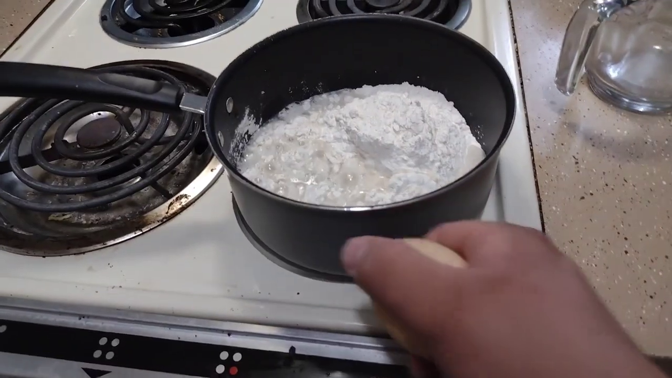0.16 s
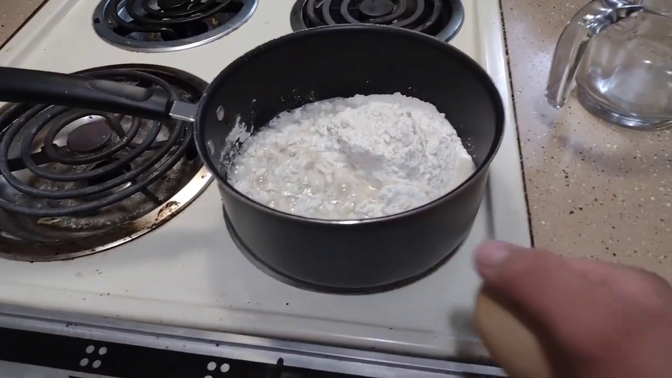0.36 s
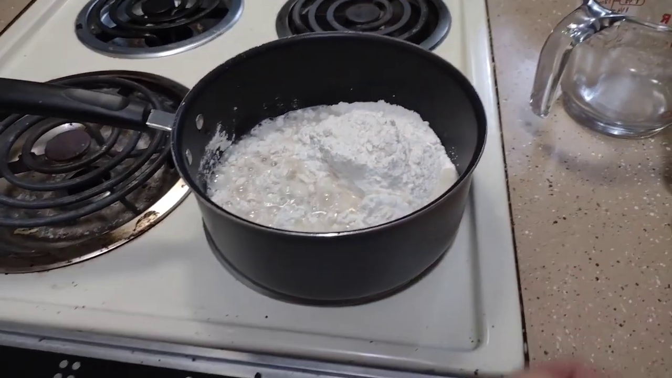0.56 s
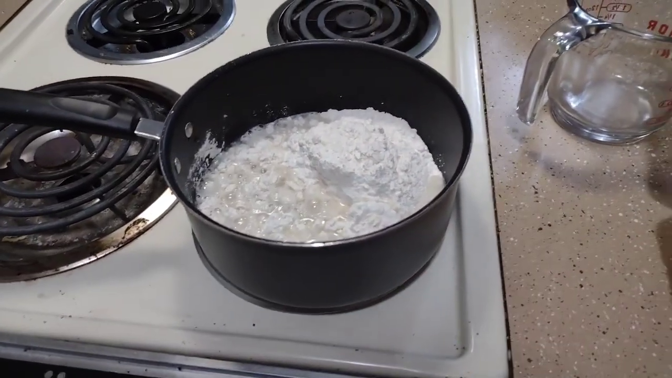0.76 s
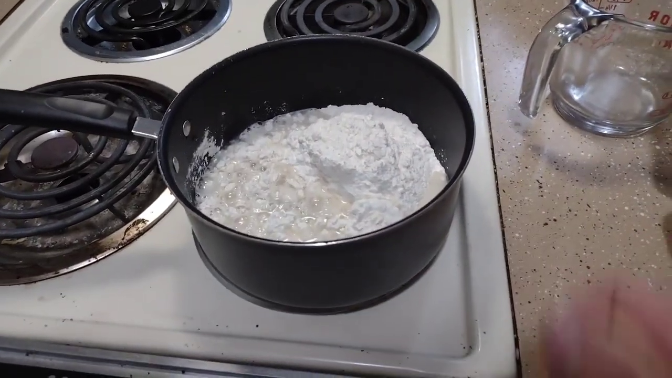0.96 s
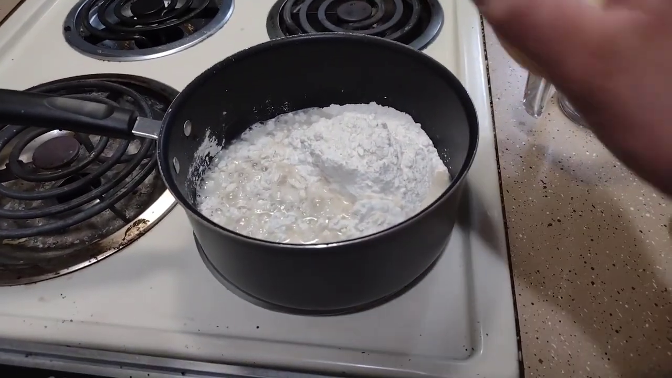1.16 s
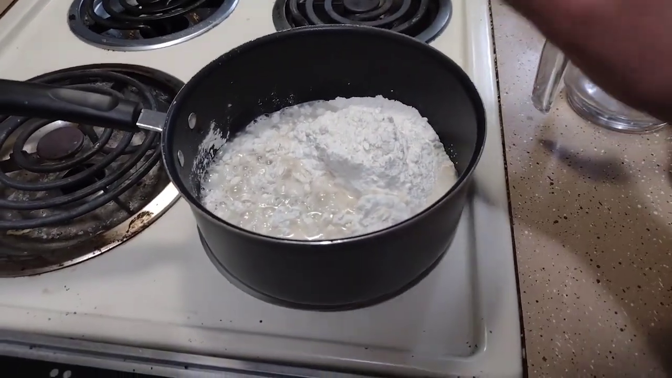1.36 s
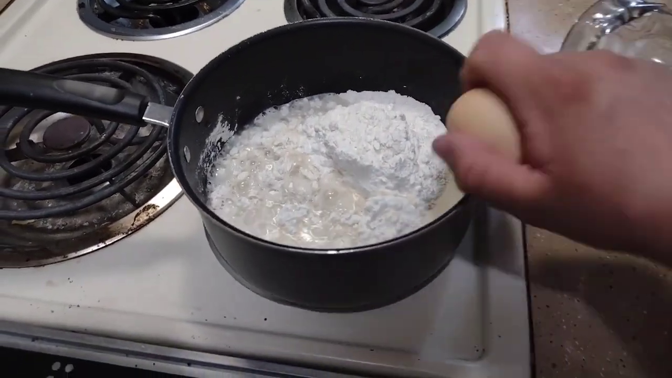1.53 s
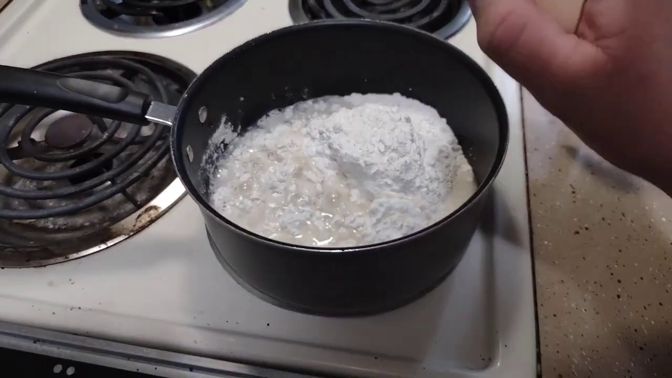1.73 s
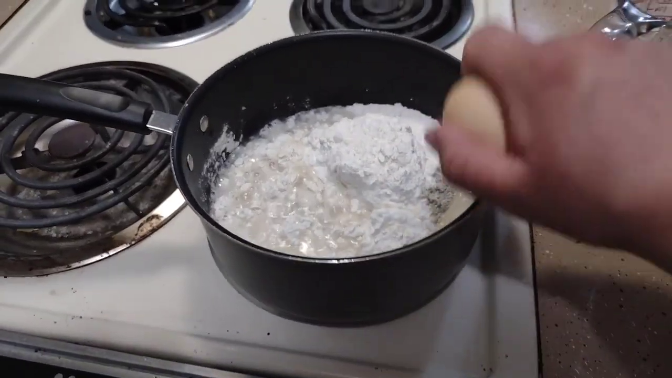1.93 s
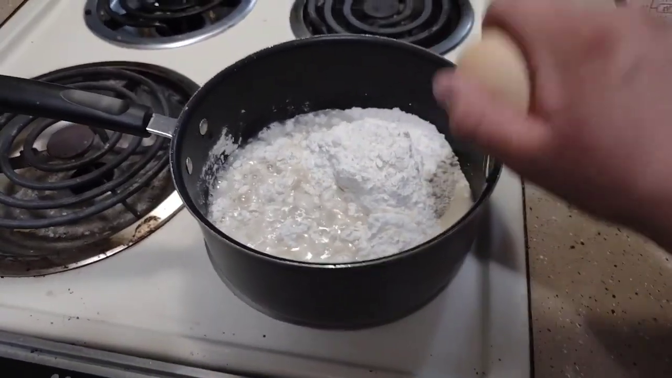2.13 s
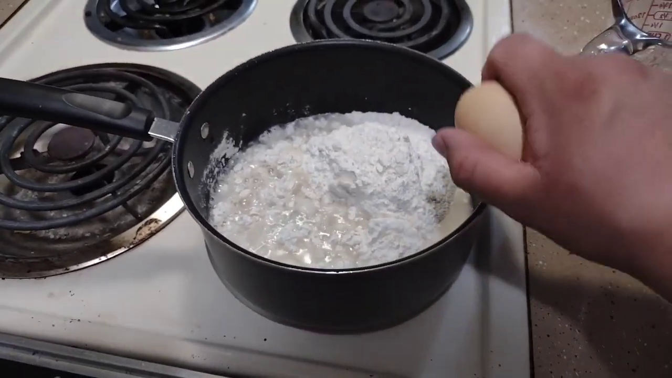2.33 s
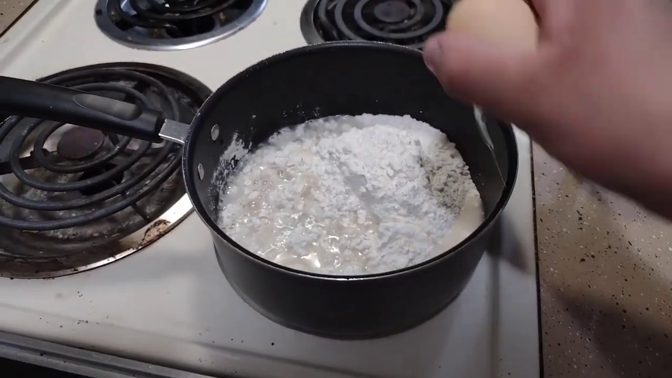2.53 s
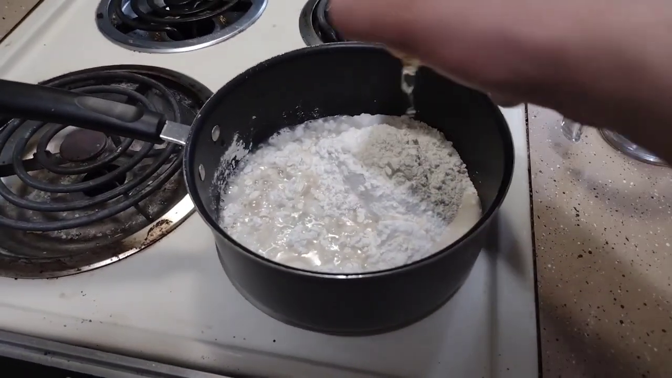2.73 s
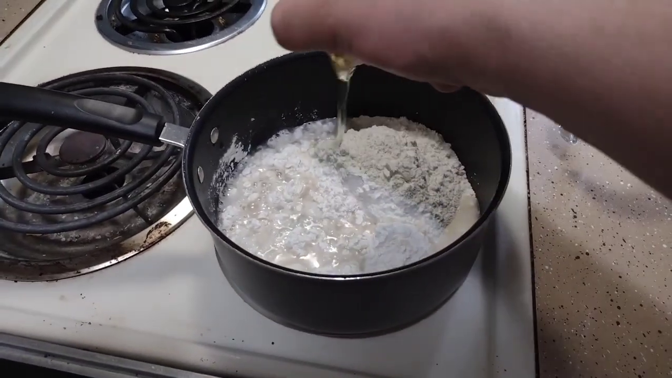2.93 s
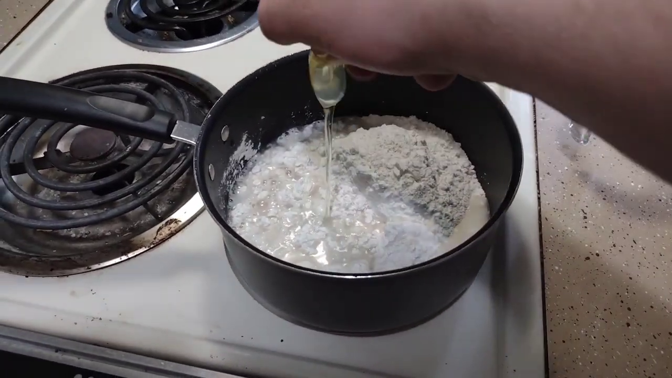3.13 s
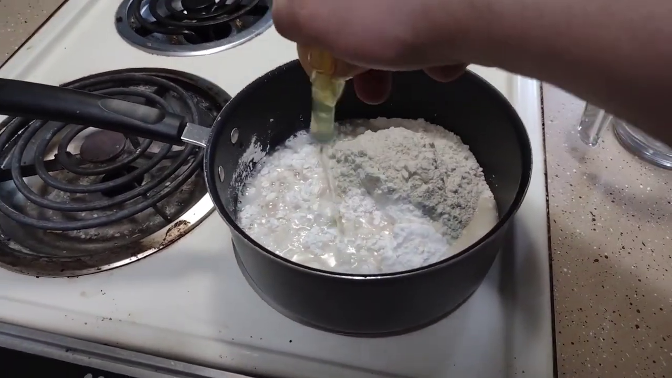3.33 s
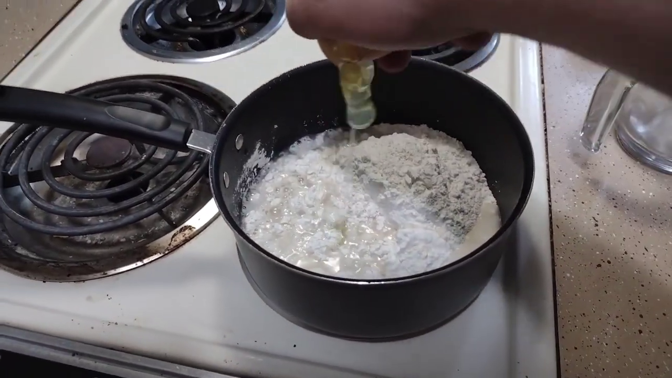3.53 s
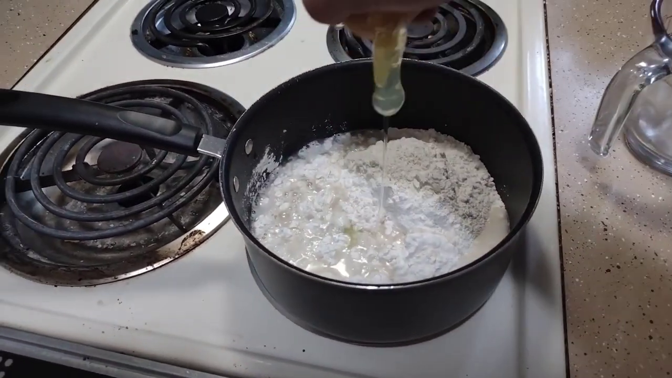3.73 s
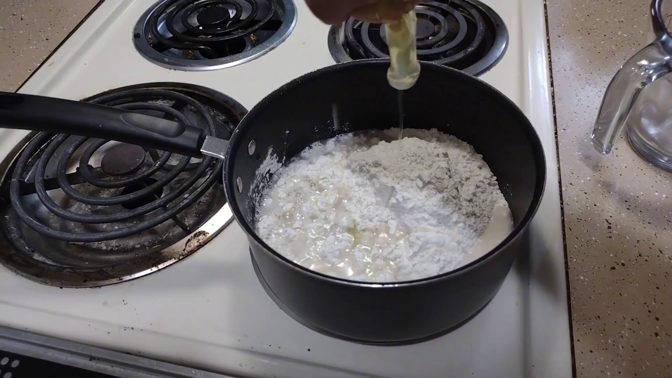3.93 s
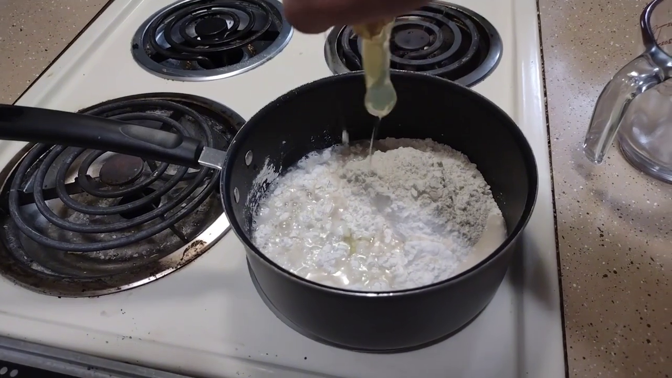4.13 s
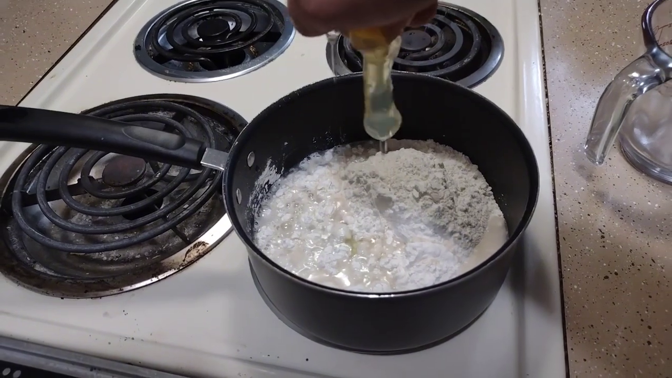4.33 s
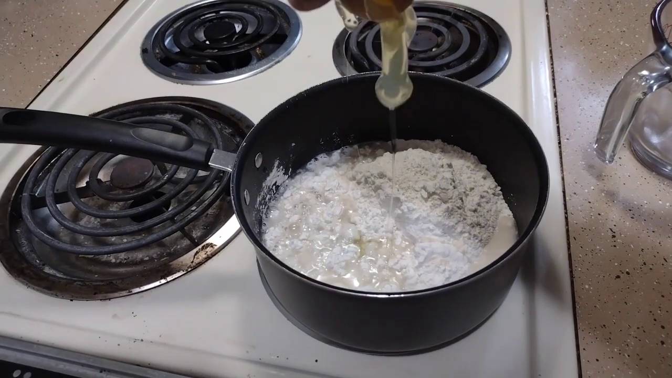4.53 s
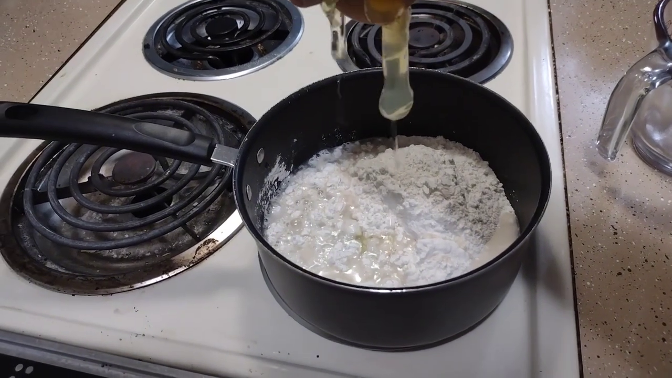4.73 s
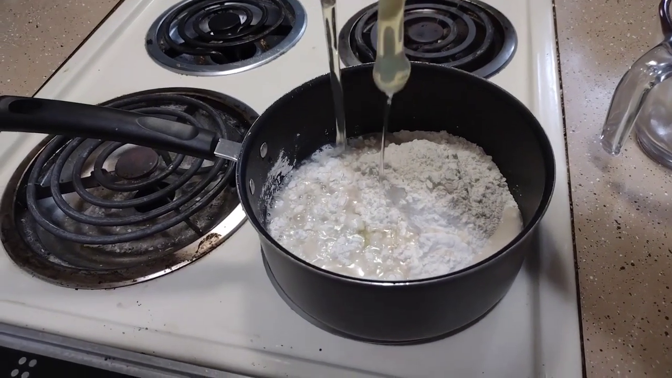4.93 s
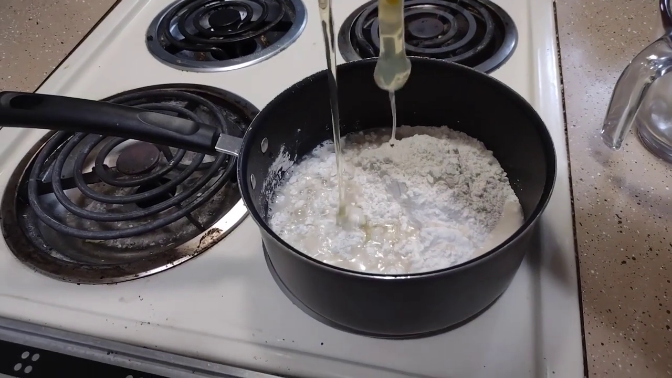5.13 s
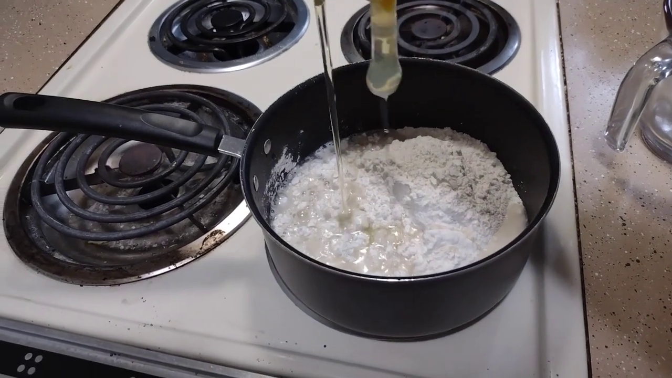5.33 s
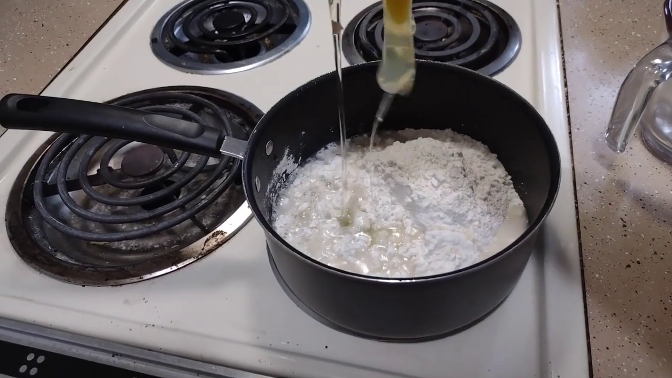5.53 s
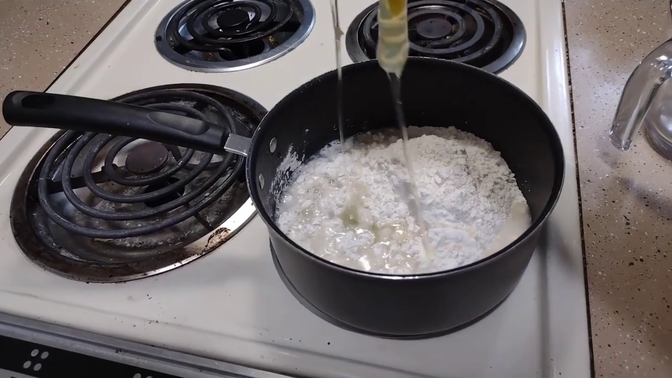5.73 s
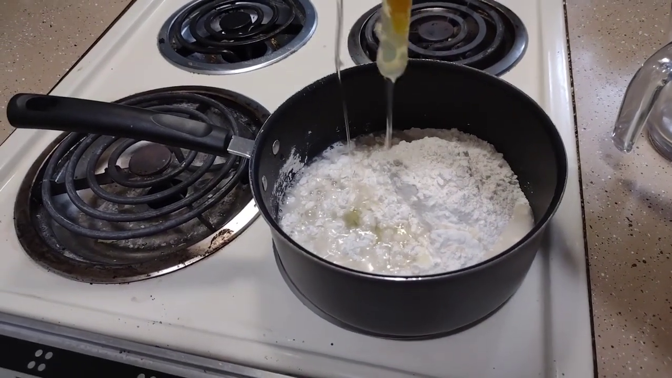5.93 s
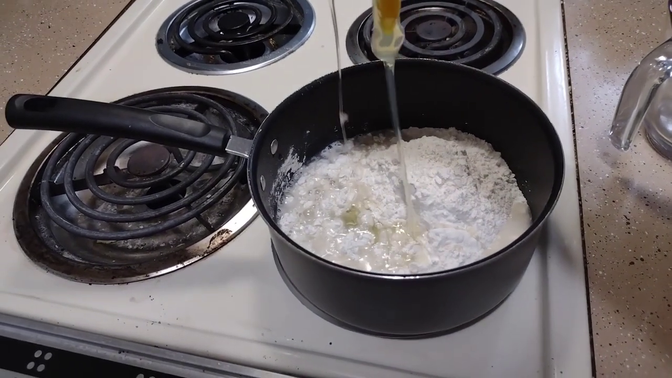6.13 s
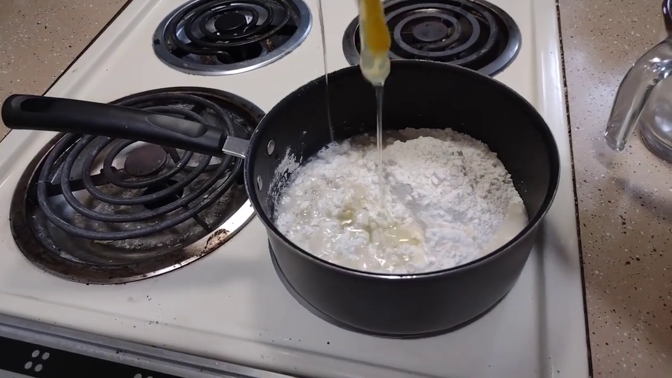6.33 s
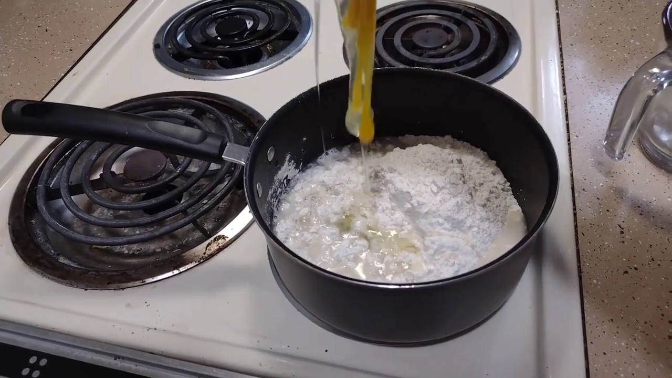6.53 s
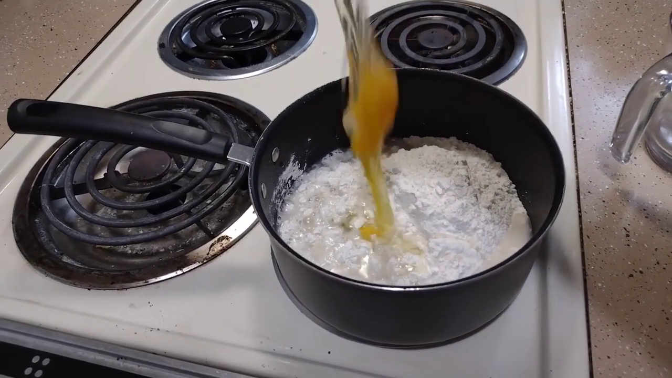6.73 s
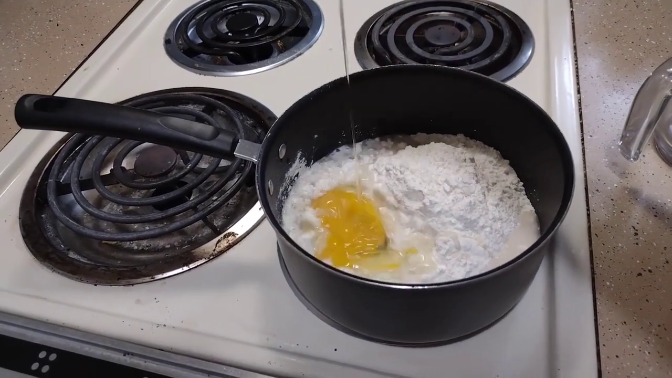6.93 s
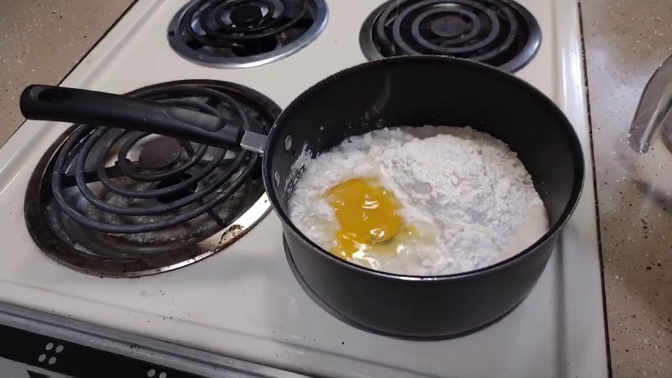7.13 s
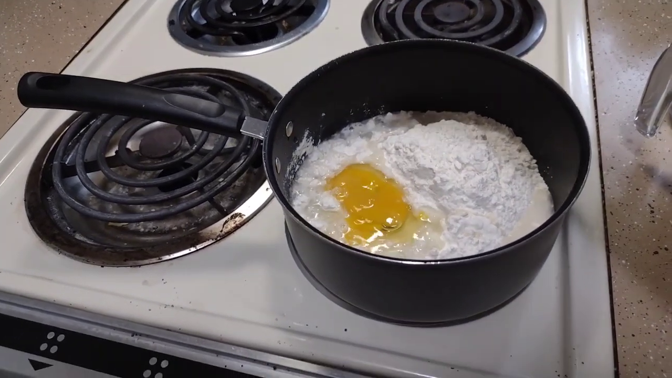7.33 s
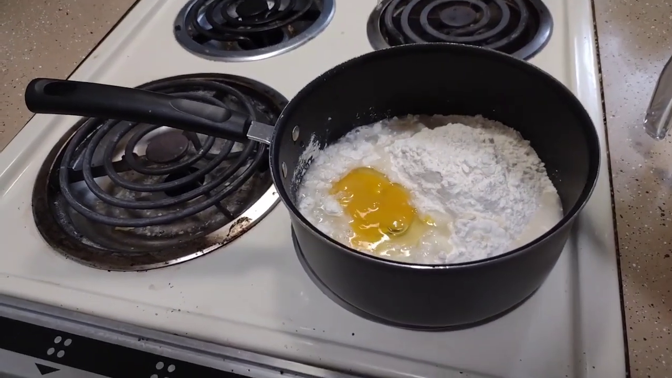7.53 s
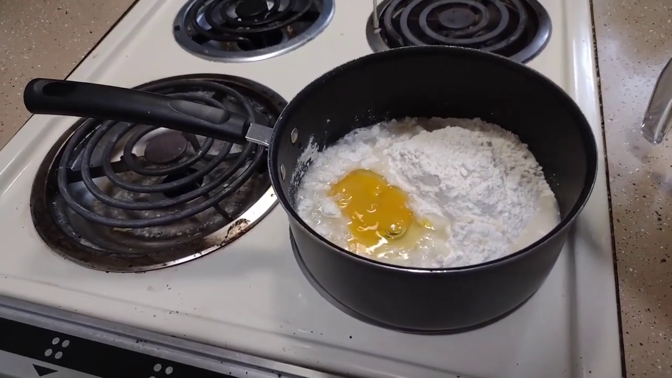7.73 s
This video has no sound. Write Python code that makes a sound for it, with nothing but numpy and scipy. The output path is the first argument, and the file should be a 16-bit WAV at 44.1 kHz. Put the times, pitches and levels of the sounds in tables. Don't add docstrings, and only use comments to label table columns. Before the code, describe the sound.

A dull knock fades right at the start, leaving low room rumble and soft hiss. Then three egg knocks hit a metal pan, the later two louder with rattling rebounds. The eggshell cracks apart crisply, and afterwards delicate crackles come in sparse clusters until the end. Close stereo microphone, short bright reflections from a hard kitchen, background dipping after the first of the three knocks.

```python
import sys
import numpy as np
from scipy import signal
from scipy.fft import rfft, irfft, next_fast_len
from scipy.io import wavfile
from scipy.ndimage import map_coordinates

SR = 44100
rng = np.random.default_rng(int(sys.argv[2]) if len(sys.argv) > 2 else 0)


def int16_out(signal):
    q = np.round(np.clip(np.atleast_2d(signal).T, -1, 1) * 32767)
    wavfile.write(sys.argv[1], SR, q.astype(np.int16))


def ratio(d):
    e = np.asarray(d, float) / 20
    return 10 ** e


N = 342602
LEAD = SR // 4

# start_s, peak_db, bright_db, left_over_right_db
CONTACTS = [(1.594, -14, 0, 4), (1.6052, -17, -25, -1), (1.608, -22.5, -20, -3.5), (1.614, -28, -12, -11),
            (1.632, -29.5, -13.5, 17.5), (1.649, -22, 2.5, 0.5), (1.673, -29.5, -3.5, 8.5),
            (1.699, -26.5, -4.5, 4.5), (1.936, -18.5, 1, -5.5), (1.948, -6.5, -12.5, 16),
            (1.951, -6.5, -33, 20), (1.956, -9, -25, -7), (1.97, -20, -10, 4.5), (1.9905, -3, -20.5, 1),
            (1.994, -9.5, -13, 10.5), (2.007, -15.5, -9, -14.5), (2.019, -23, -5, -1), (2.051, -27, -13, 2),
            (2.065, -11, -23, 13.5), (2.089, -16, -15, 3.5), (2.096, -16, -26, -11), (2.107, -39, -12, 6),
            (2.272, -21, -8, -10.5), (2.277, -23.5, -2, 17), (2.2901, -6.5, -27, 1), (2.309, -20, -10, 3),
            (2.323, -9, -12, 3), (2.338, -11.5, -11.5, -2), (2.353, -14.5, -17, 10)]
# start_s, peak_db, bright_db, left_over_right_db
EARLIER_CONTACTS = [
    (-.06, -10, -30, 1),
    (-.015, -21, -28, 1),
    (.05, -40, -24, 1),
]
# start_s, peak_db, low_hz, high_hz, high_over_low_db
PAN_RINGS = [(1.594, -18, 660, 1710, 5.5), (1.604, -16, 686, 1950, 5), (1.615, -22, 710, 1870, 0),
             (1.641, -22.5, 573, 1617, 5.5), (1.653, -19, 969, 2260, -4), (1.935, -20.5, 614, 1370, -6),
             (1.946, -16.5, 470, 1636, 3.5), (1.949, -12, 967, 2660, -0.5), (1.955, -9.5, 1083, 1660, -2.5),
             (1.965, -19, 448, 2760, -7), (1.973, -14, 440, 1710, -3), (1.989, -11, 719, 1877, 0),
             (1.993, -11.5, 1120, 2330, -2), (2.009, -24, 1210, 1290, -6), (2.021, -17, 953, 2320, -10),
             (2.046, -24, 830, 2090, -2), (2.064, -25, 1130, 1554, 0), (2.088, -24, 1260, 1560, 2),
             (2.272, -21, 650, 2630, 2), (2.276, -21.5, 1290, 1310, -6), (2.29, -15, 575, 1990, -1),
             (2.309, -19, 300, 2300, 0), (2.322, -16.5, 1130, 2480, -7), (2.336, -21, 1155, 1300, 2),
             (2.351, -26, 1145, 2250, 9)]
# frequency_hz, level_db
CLANK_COLOUR = [(180, -30.5), (300, -16.5), (400, -11), (560, -3), (702, -1.5), (890, -8.5), (1100, -4.5),
                (1300, -3.5), (2330, -2.5), (3600, -22), (4600, -18), (6200, -50.5), (9900, -120)]
# frequency_hz, width_hz, level_db
PAN_BODY = [(485, 34, 0), (714, 22, 5.5), (953, 15, 4), (1066, 13, 4), (1200, 35, -11.5), (1560, 43, -3.5),
            (1740, 15, -5), (1884, 23.7, -5), (2270, 30, -8.5), (2355, 24, -5), (2800, 47, -3.5),
            (3270, 30.3, -9.5)]
# frequency_hz, width_hz, level_db
PAN_WALL = [(3620, 110, -7.5), (4270, 40, -7), (4790, 88, -17), (5170, 86, -6), (5800, 35, -5),
            (6320, 79, -4), (6200, 30, -6), (6700, 33, -8), (7700, 55, -16)]
# frequency_hz, level_db
RIM_COLOUR = [(1470, -28.5), (2500, 0), (3490, -6.5), (4800, -7), (6110, -10), (7830, -13), (11900, -17),
              (16000, -26)]
# frequency_hz, width_hz, level_db
STOVE_SHEET = [(115, 80, 0), (190, 153, 2.5), (310, 91, 1)]

# start_s, peak_db, fragment_hz, large_piece_db, sizzle_db
OPENING_CRACKS = [(1.917, -59, 3800, -2.5, -15), (2.5333, -48.5, 4310, -2, -23),
                  (2.584, -51, 4320, -16, -15.5), (2.8634, -61.5, 5330, -2, -10.5),
                  (2.887, -64, 4820, -21, -21), (2.9114, -62.5, 5615, -17.5, -15.5),
                  (3.0525, -34.5, 3600, -12, -7.5), (3.0705, -30.5, 4390, -13, -3),
                  (3.0975, -31.5, 5180, -8.5, -9.5), (3.1075, -36, 3400, -9.5, -4),
                  (3.282, -36, 4036, -1.5, -13),
                  (2.933, -44, 5980, -16.5, -14.5), (2.955, -49.5, 3150, -11, -13),
            (2.9672, -50, 4200, 15.5, -7.5), (2.978, -34, 2930, -12.5, -24),
            (2.991, -35.5, 2950, -13.5, -17.5), (3.0089, -30.5, 4300, -12.5, -15),
            (3.0264, -34, 4060, -10, -20), (3.0335, -33.5, 3030, -6, -15), (3.049, -28, 2933, -10, -12),
            (3.0586, -27, 3950, -15.5, -12), (3.08, -26, 4900, -15.5, -5.5), (3.087, -26.5, 4200, -13, -9),
            (3.0932, -25.5, 4500, -22, -13.5), (3.1022, -24.5, 2790, -16, -9),
            (3.117, -35, 4850, -18, -10.5), (3.1643, -40, 4177, -24, -1), (3.2278, -15, 4270, -13, -15),
            (3.274, -26, 4630, -9.5, -8), (3.2921, -12.5, 4200, -7, -16.5),
            (3.2976, -12.5, 4300, -8, -13.5), (3.3045, -18.5, 4777, -20.5, -13),
            (3.3125, -22, 2680, -18.5, -13.5), (3.3216, -21, 3320, -10, -18.5),
            (3.3329, -19, 4440, -19, -14), (3.3459, -17, 4350, -25, -18.5), (3.3638, -31, 4060, -13, -13.5),
            (3.378, -29.5, 3750, -19, -13), (3.3896, -33.5, 4520, -15, -14)]
# start_s, peak_db,
# fragment_hz, large_piece_db, sizzle_db
LATER_CRACKS = [(3.617, -40, 4350, -4.5, -11.5), (3.6346, -42, 4550, -15, -20),
                (3.7412, -45.5, 3620, -7, -19), (3.8167, -44, 3900, -14, -14),
                (3.855, -54.5, 3710, -6, -8), (3.925, -57, 3390, 2, -19), (4.0704, -54.5, 3820, 3, -16),
                (4.123, -48, 4420, 9, -19), (4.1297, -46.5, 4400, 0.5, -21),
                (4.2418, -40.5, 4300, -12, -22), (4.3044, -49.5, 4240, -7.5, -17),
                (4.356, -44, 4330, -12, -29), (4.5893, -50, 4550, -23.5, -33),
                (4.6286, -47, 4190, -10, -23), (4.6391, -43, 3700, -5.5, -19),
                (4.6472, -43, 3700, -5, -18.5), (4.7177, -50.5, 4010, -18, -25),
                (4.7653, -40, 4200, -23, -34), (5.1058, -59, 4210, -1, -26), (5.1874, -46, 3780, -25, -19),
                (5.2573, -50, 3740, -12, -14), (5.2994, -53, 4080, -15, -26), (5.3594, -52, 3320, -9, -16),
                (5.4008, -45.5, 4030, -18, -13),
                (5.434, -42, 4900, -6, -14), (5.437, -26, 3660, -14.5, -17.5),
                   (5.4454, -47, 3370, -15, -15), (5.4517, -32.5, 3600, -13, -11),
                   (5.463, -42, 3980, -3, -18), (5.4716, -42, 3470, -6, -25), (5.497, -40, 4000, -26, -26),
                   (5.519, -32.5, 4160, -29, -26), (5.525, -47, 3550, -9, -29), (5.659, -63, 3770, -4, -23),
                   (5.7423, -57.5, 3200, -8, -20), (5.765, -55, 3200, -18, -11.5),
                   (5.7822, -50, 4470, -5, -18), (5.7912, -33.5, 4000, -16, -24),
                   (5.8528, -29, 3300, -9.5, -21), (5.8642, -36, 3840, -25, -21),
                   (5.884, -36.5, 4200, -16, -20), (5.9412, -40, 3620, -5, -14),
                   (5.9512, -35.5, 3580, -12, -19), (5.971, -32, 3190, -26, -23),
                   (5.9935, -45, 3200, -18, -28), (6.0613, -39, 3800, -14, -19.5),
                   (6.098, -43, 4770, -24, -37), (6.25, -48.5, 3150, -15, -17),
                   (6.274, -48.5, 3300, -3, -16), (6.3314, -58, 4880, -14, -11),
                   (6.343, -44, 4730, -12, -12.5), (6.4577, -57, 4790, -10.5, -24),
                   (6.4724, -58, 4640, -26, -22), (6.4963, -40, 5400, -14, -11),
                   (6.558, -53, 3500, -12, -22), (6.7113, -58, 4890, -7, -20),
                   (6.8891, -33.5, 4800, -30, -25), (6.9161, -43, 4200, -10, -22),
                   (6.9228, -48, 3200, -21, -21), (7.0269, -50.5, 5150, -25, -20),
                   (7.0583, -33.5, 4750, -41.5, -32), (7.0604, -43, 4620, -32, -7.5),
                   (7.08, -39, 4770, -46, -17), (7.1406, -50, 4970, -29, -18),
                (4.110, -57, 3500, 3, -21), (4.1365, -52, 3450, -2, -12), (4.148, -52, 4300, 1, -22),
               (4.158, -56, 4300, -1, -21), (4.171, -58, 4300, 1, -24), (4.268, -50.5, 6100, -20, -20),
               (3.664, -53, 4500, -6, -23), (3.951, -63, 3900, 3, -24), (6.254, -51.5, 3200, -2.5, -26),
               (6.266, -60, 7500, -20, -14), (6.36, -57, 3100, -6, -24), (6.373, -63, 5280, -18, -22),
               (6.444, -58.5, 4900, -5, -22), (6.11, -57, 5200, -15, -26)]
# start_s, large_piece_hz, left_over_right_db
HAND_GRIP = [(1.92, 2450, 5), (2.53, 1800, 1), (2.932, 1560, -1.5), (2.99, 1600, 3.5), (3.11, 1590, 1),
             (3.22, 2470, 1.5), (3.27, 1730, 3), (3.289, 1720, 2), (3.35, 1860, -0.5), (3.62, 2710, 2),
             (4.07, 2360, 2.5), (4.25, 2350, 2.5), (4.639, 2700, -1.5), (4.77, 2670, 9), (5.44, 2700, -3.5),
             (5.52, 2850, 9.5), (5.95, 2900, -4), (6.3, 3000, -4), (6.5, 3100, 0), (6.9, 2606, 1.5),
             (7.07, 2596, 5.5)]
# start_s, delay_samples
LEFT_LAG = [(2.4, 7), (2.9, 4), (5, 4), (5.5, 10), (6.9, 9), (7.05, 2)]
# frequency_hz, level_db
SNAP_COLOUR = [(290, -36.5), (500, -25.5), (2690, -8.5), (3290, 4.5), (4340, -4), (16000, -20)]
# frequency_hz, level_db
SIZZLE_COLOUR = [(3000, -13), (6500, -3), (9000, -7), (13000, -7.5), (15500, -13.5), (18000, -31)]
# frequency_hz, width_hz, level_db
TORN_FLAKES = [(1710, 900, -7.5), (2700, 660, 5.5), (4300, 1000, 5.5), (6430, 2500, 3.5),
               (11020, 6000, -8.5)]
# frequency_hz, width_hz, level_db
HALF_SHELL = [(2450, 640, 8), (3200, 3000, 9), (4200, 330, 7.5), (5270, 980, -1), (8520, 9000, -7)]
# start_s, level_db
TEARING_PULL = [
    (2.84, -85.5),
    (2.982, -54),
    (3.05, -39.5),
    (3.105, -46.5),
    (3.188, -71),
    (3.24, -66.5),
    (3.402, -66),
    (3.5, -82),
]
# start_s, hold_s, level_db
HAND_SQUEEZES = [(2.622, 0.15, -78), (3.561, 0.33, -66), (4.217, 0.14, -66.5), (4.446, 0.29, -73.5),
                 (5.122, 0.47, -72), (5.62, .08, -78), (5.88, 0.071, -58.5), (6.264, 0.037, -64),
                 (6.418, 0.14, -70.5), (6.7, 0.067, -78.5), (5.442, 0.048, -64.5), (7.001, 0.052, -69.5)]

# frequency_hz, t60_s
KITCHEN_T60 = [(120, 0.5), (500, 0.36), (2000, 0.25), (5000, 0.25), (12000, 0.14)]
# frequency_hz, level_db
KITCHEN_LEVEL = [(120, -5), (1000, 2.5), (4000, 2), (12000, 3)]
# frequency_hz, likeness
LIKENESS = [(60, 0.14), (180, 0.94), (550, 0.57), (1650, 0.2), (4970, -0.26), (15000, 0.12)]
# frequency_hz, level_db
ROOM_COLOUR = [(15, -58), (25, -21.5), (36, -8), (48, -14.5), (85, -14), (118, -4.5), (145, -11),
               (194, -0.5), (293, 1.5), (501, -9), (591, -5.5), (858, -14.5), (1220, -14.5), (1410, -24),
               (3500, -64.5), (4550, -80.5), (7700, -120)]
# frequency_hz, level_over_room_db
FRIDGE_HUM = [(59.5, -10), (119, -8.5)]
# start_s, width_s, rise_db
HANDLING = [
    (1.73, .07, 5),
    (2.07, .07, 13),
    (2.33, .08, 9),
    (3.09, .07, 9),
    (3.35, .05, 7),
]
# frequency_hz, level_db
HISS_COLOUR = [(880, -31), (1500, -5.5), (2770, -12), (2970, -15), (14800, -26), (16500, -31)]
# start_s, level_db
HISS_SETTLES = [(0, 14.5), (.3, 10), (.8, 5.5), (7.77, 5)]


def knocks():
    body, rim, bounce, thud = np.zeros((4, 2, LEAD + N))
    contacts = [*EARLIER_CONTACTS, *CONTACTS]
    strikes = np.diff(np.transpose(contacts)[0], prepend=-1) > .1
    for (s, db, bright_db, pan_db), strike in zip(contacts, strikes):
        blow = burst(t60=0.018, rise=0.0007) + 1.2 * burst(t60=0.0026, rise=0.00024)
        place(body, s, ratio(db - 9.5) * blow, .5 * pan_db)
        scratch = burst(t60=0.012, rise=0.00032)
        place(rim if strike else bounce, s, ratio(db + bright_db + 2.0) * scratch, pan_db)
        thud_db = -26 + 0.53 * (db + 11.0) - 14 * max(s - CONTACTS[0][0], 0) + 2.8 * (s < .1)
        place(thud, s, ratio(thud_db) * burst(t60=0.054, rise=0.00059), 0)
    rim = rim + ratio(-4.5) * filtered(bounce, lambda f: 1 / (1 + 1j * f / 8480) ** 3)
    body = dented(body)
    pan = filtered(body, lambda f: modes(PAN_BODY)(f) / (1 + 1j * f / 3500) ** 2)
    clank = filtered(body, causal(CLANK_COLOUR)) + ratio(-9.5) * pan
    scrape = filtered(rim, causal(RIM_COLOUR)) + ratio(-14.5) * filtered(rim, modes(PAN_WALL))
    return clank + scrape + filtered(thud, modes(STOVE_SHEET))


def dented(body):
    dented_s = 1.9
    soft_hz, dull_hz, hard_hz = 900, 3520, 2195

    def soft(f):
        return (1 + .4j * f / soft_hz) / (1 + 1j * f / soft_hz) / (1 + 1j * f / dull_hz)

    def hard(f):
        return (1 + 1.25j * f / hard_hz) / (1 + 1j * f / hard_hz)

    whole = np.arange(LEAD + N) < LEAD + dented_s * SR
    return np.where(whole, ratio(3.0) * filtered(body, soft), filtered(body, hard))


def rings():
    out = np.zeros((2, LEAD + N))
    t = np.arange(SR // 16) / SR
    times, *_, pans_db = np.transpose(CONTACTS)

    def mode(hz, t60, turn):
        tone = np.sin(2 * np.pi * hz * t + turn * np.array([[-1], [1]]))
        return tone * ratio(-60 * t / t60) * (1 - np.exp(-t / 0.0014))

    for s, db, low_hz, high_hz, high_db in PAN_RINGS:
        low = mode(low_hz, t60=.028, turn=.2)
        high = mode(high_hz, t60=0.031, turn=0.93)
        place(out, s, ratio(db - 3) * (low + ratio(high_db) * high), 0.55 * np.interp(s, times, pans_db))
    return out


def cracks(rows, snap_db, chip_db, middle_db, pop_db, scatter, split):
    out, snaps, sizzle = np.zeros((3, 2, LEAD + N))
    click = np.arange(SR // 16) == 0
    times, *grip = np.transpose(HAND_GRIP)
    for s, db, hz, piece_db, sizzle_db in rows:
        piece_hz, pan_db = [np.interp(s, times, column) for column in grip]
        piece_hz *= np.exp(scatter * rng.standard_normal())
        pan_db += 2.5 * rng.standard_normal()
        middle_hz = np.sqrt(hz * piece_hz)
        pop_hz = 1000 * np.exp(0.083 * rng.standard_normal())
        pieces = [(-2.5, hz, 16, 0.1, pan_db),
                  (chip_db, 1.33 * hz, 5.8, 0.064, pan_db),
                  (piece_db + 2.5, piece_hz, 20, 0.1, pan_db),
                  (middle_db, middle_hz, 4.7, 0.29, pan_db),
                  (pop_db, pop_hz, 4.1, 0.21, 0)]
        for level_db, pitch_hz, cycles, spread, side_db in pieces:
            ring = fragment(pitch_hz, cycles, spread, split)
            place(out, s, ratio(db + level_db) * ring, side_db, late=False)
        place(snaps, s, ratio(db + snap_db) * click, pan_db)
        spray = np.array([burst(t60=0.014, rise=.0001) for capsule in "LR"])
        place(sizzle, s, ratio(db + sizzle_db + 8.0) * (click + 0.8 * spray), pan_db)
    out = filtered(out, lambda f: (1j * f / (900 + 1j * f)) ** 2)
    return out + filtered(snaps, causal(SNAP_COLOUR)) + filtered(sizzle, causal(SIZZLE_COLOUR))


def fragment(hz, cycles, spread, split):
    t = np.arange(SR // 32) / SR

    def swell(u):
        return ratio(-60 * u / cycles) * (1 - np.exp(-u / 1.5)) ** 2

    ring = np.sin(2 * np.pi * hz * t + np.pi * np.array([[-.25], [.25]])) * swell(t * hz)
    pieces_hz = hz * np.exp(rng.normal(0, spread, (8, 1)))
    start = rng.exponential(1, (8, 1)) ** 2 * .003
    late = np.maximum(t - start, 0)
    rest = np.sin(2 * np.pi * pieces_hz * late) * swell(late * pieces_hz) * ratio(-290 * start)
    return (ring + split * rng.standard_normal((2, 8)) @ rest) / swell(t * hz).max()


def splintered(rows):
    out = [*rows]
    for s, db, hz, piece_db, sizzle_db in rows:
        wait, weakness = rng.exponential(1, 2)
        out.append((s + 0.02 * (.5 + wait), db - 16 - 3 * weakness, hz, piece_db, sizzle_db - 9))
    return out


def crackle(level_db, flakes, rate, spread_db):
    x = np.zeros((2, LEAD + N))
    for hz, width_hz, db in flakes:
        at = rng.integers(0, LEAD + N, round(rate * (LEAD + N) / SR))
        strength = ratio(spread_db * np.minimum(rng.exponential(1, len(at)), 3))
        ticks = np.zeros((2, LEAD + N))
        ticks[:, at] = strength * rng.standard_normal((2, len(at)))
        x += ratio(db) * unit(signal.lfilter(*signal.iirpeak(hz, hz / width_hz, SR), ticks))
    return unit(x) * ratio(level_db - 2.5)


def pressure():
    grab_db_s, relax_db_s, slack_db = 141, 62, -93
    t = (np.arange(LEAD + N) - LEAD) / SR
    each = []
    for s, hold, db in HAND_SQUEEZES:
        rising = grab_db_s * np.maximum(s - t, 0)
        relaxing = relax_db_s * np.maximum(t - s - hold, 0)
        each.append(db - rising - relaxing)
    level_db = np.maximum(np.max(each, axis=0), slack_db)
    return np.where(t > CONTACTS[-1][0], level_db, -200)


def kitchen(x):
    out = np.zeros((2, x.shape[1] + SR))
    step = SR // 5
    for at in range(0, x.shape[1], step):
        hz, t, z = signal.stft(rng.standard_normal((2, SR // 2)), SR, nperseg=256)
        z[1] += along(LIKENESS, hz)[:, None] * (z[0] - z[1])
        t60 = along(KITCHEN_T60, hz)[:, None]
        wet_db = along(KITCHEN_LEVEL, hz)[:, None]
        shape = ratio(wet_db - 60 * t / t60) / np.sqrt(t60 * SR / 14)
        shape += ratio(wet_db - 64.5 - 60 * t / 1.0)
        tail = signal.istft(z * shape, SR, nperseg=256)[1][:, :SR // 2]
        wet = signal.fftconvolve(x[:, at:at + step], tail, axes=1)
        out[:, at + 130:][:, :wet.shape[1]] += wet
    return out[:, :x.shape[1]]


def room_tone():
    def mid_side(f):
        turn = np.arccos(np.clip(along(LIKENESS, f), -1, 1)) / 2
        return ratio(along(ROOM_COLOUR, f)) * np.array([np.cos(turn), np.sin(turn)])

    def waver():
        return map_coordinates(rng.standard_normal(99), [np.arange(N) * 11 / SR])

    mid, side = filtered(rng.standard_normal((2, N)), mid_side)
    rumble = unit(np.array([mid + side, mid - side]))
    hum = np.zeros(N)
    for hz, db in FRIDGE_HUM:
        phase = 2 * np.pi * hz * np.arange(N) / SR + .5 * waver()
        hum += ratio(db + 1.5 * waver()) * np.sin(phase)
    return ratio(ride() + 0.4) * (rumble + hum)


def ride():
    open_db, ducked_db, duck_s, duck_takes_s = -53, -61.5, 1.82, 0.079
    t = np.arange(N) / SR
    duck = (ducked_db - open_db) * np.clip((t - duck_s) / duck_takes_s, 0, 1)
    swells = sum(db * np.exp(-((t - s) / width) ** 2) for s, width, db in HANDLING)
    return open_db + duck + swells


def amplifier_hiss():
    noise = filtered(rng.standard_normal((2, N)), lambda f: ratio(along(HISS_COLOUR, f)))
    return noise * ratio(curve(HISS_SETTLES, N) - 85.5 + 4.0)


def burst(t60, rise):
    t = np.arange(SR // 16) / SR
    shape = ratio(-60 * t / t60) * (1 - np.exp(-t / rise))
    x = rng.standard_normal(len(t)) * shape
    return x * np.linalg.norm(shape) / np.linalg.norm(x)


def place(track, s, x, pan_db, late=True):
    at = LEAD + round(s * SR)
    lag = late * round(np.interp(s, *np.transpose(LEFT_LAG)))
    left, right = np.broadcast_to(x, (2, x.shape[-1]))
    track[0, at + lag:][:len(left)] += ratio(pan_db / 2) * left
    track[1, at:][:len(right)] += ratio(-pan_db / 2) * right


def unit(x):
    return x / np.sqrt(np.mean(x ** 2) + 1e-20)


def along(points, hz):
    f, v = np.transpose(points)
    return np.interp(np.log(hz + 1), np.log(f + 1), v)


def curve(rows, size):
    s, v = np.transpose(rows)
    return np.interp((np.arange(size) - size + N) / SR, s, v)


def filtered(x, response):
    m = next_fast_len(x.shape[-1] + SR // 2)
    h = response(np.fft.rfftfreq(m, 1 / SR))
    h = h / np.sqrt(np.mean(np.abs(h) ** 2))
    return irfft(rfft(x, m) * h, m)[..., :x.shape[-1]]


def modes(peaks):
    def response(f):
        total = 0
        for k, (hz, width, db) in enumerate(peaks):
            damping = 1j * f * width
            total = total + (-1) ** k * ratio(db) * damping / (hz * hz - f * f + damping)
        return total
    return response


def causal(points):
    def response(f):
        c = irfft(np.log(np.maximum(ratio(along(points, f)), 1e-5)))
        c[1:len(c) // 2] *= 2
        c[len(c) // 2 + 1:] = 0
        return np.exp(rfft(c))
    return response


def scene():
    pan, ringing = knocks(), rings()
    tearing_db = curve([(2.7, -200), *TEARING_PULL, (3.6, -200)], LEAD + N)
    opening = crackle(tearing_db, TORN_FLAKES, rate=400, spread_db=5)
    creeping = crackle(pressure(), HALF_SHELL, rate=300, spread_db=2.5)
    breaking = cracks(OPENING_CRACKS, snap_db=-12, chip_db=-8, middle_db=-3,
                      pop_db=-14.5, scatter=0.023, split=0.34)
    later = cracks(splintered(LATER_CRACKS), snap_db=-29, chip_db=-12,
                   middle_db=-16.5, pop_db=-13, scatter=0.017, split=0.46)
    tearing = breaking + opening
    squeezing = later + creeping
    shell = filtered(ratio(-5.5) * tearing + ratio(-7.5) * squeezing, lambda f: 1j * f / (2600 + 1j * f))
    answer = kitchen(ratio(-1.0) * pan + ratio(-6) * ringing + shell)
    near = pan + ringing + tearing + squeezing
    return (near + answer)[:, LEAD:] + room_tone()


def band_limit(x):
    return signal.sosfilt(signal.butter(12, 16750, fs=SR, output="sos"), x)


def record(dry):
    low_pass = signal.butter(30, 15750, fs=SR, output="sos")
    high_pass = signal.butter(2, 40, "high", fs=SR, output="sos")
    mix = signal.sosfilt(low_pass, dry + amplifier_hiss())
    mix = signal.sosfilt(high_pass, mix)
    return band_limit(mix)


dry = scene()
out = record(dry)
int16_out(out)
```